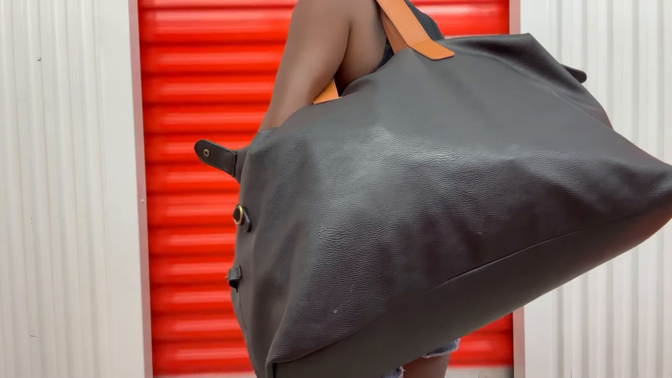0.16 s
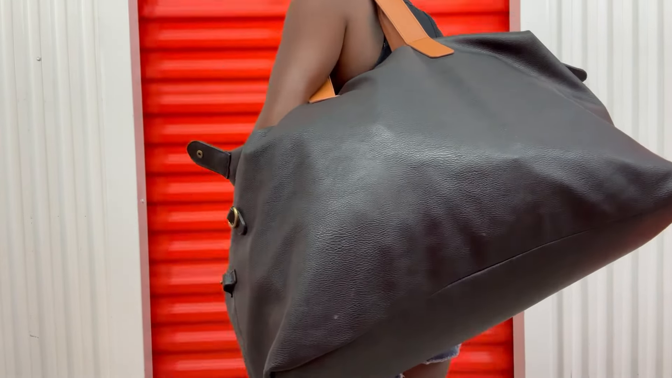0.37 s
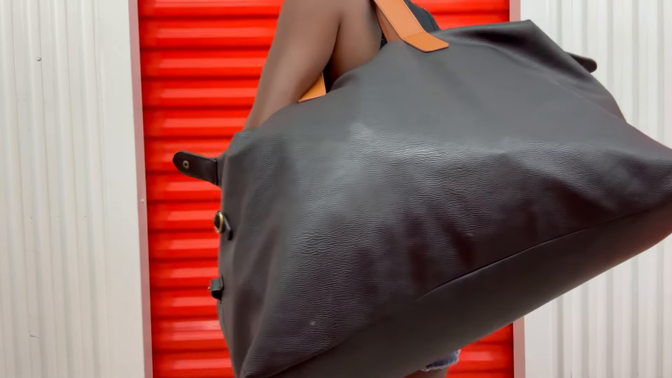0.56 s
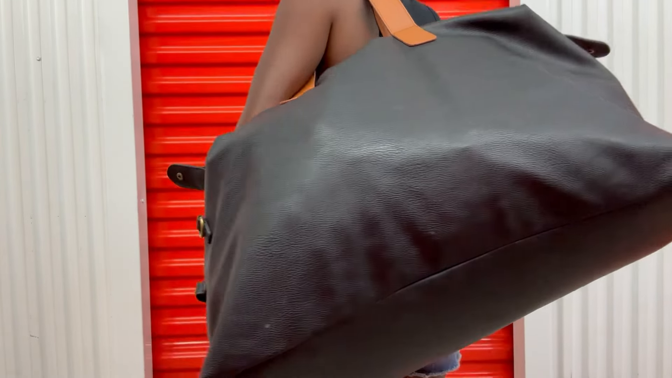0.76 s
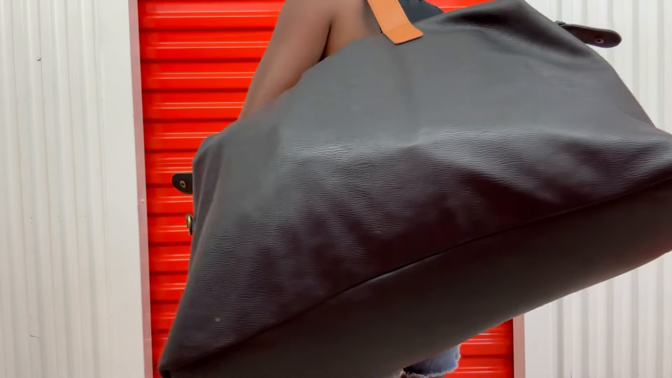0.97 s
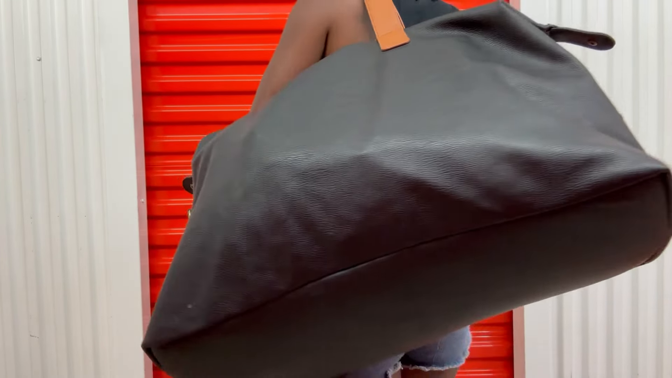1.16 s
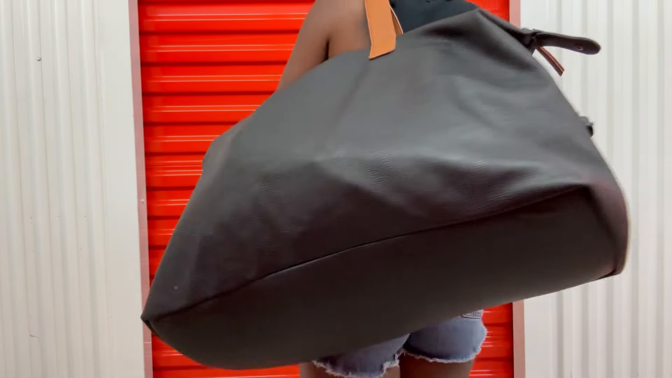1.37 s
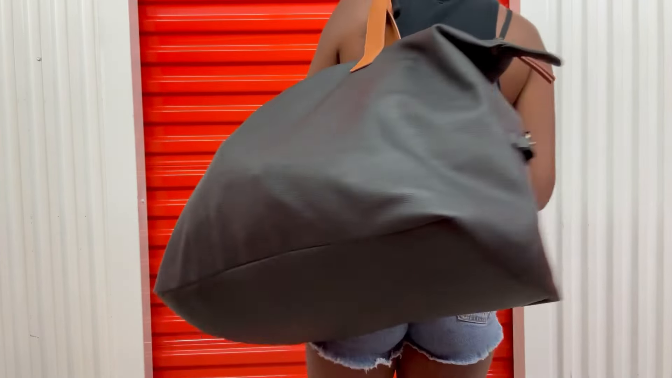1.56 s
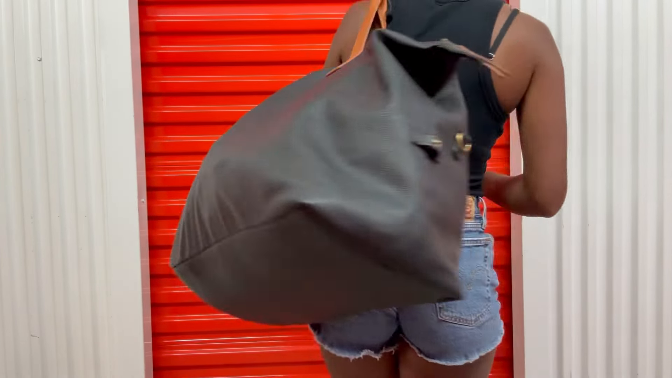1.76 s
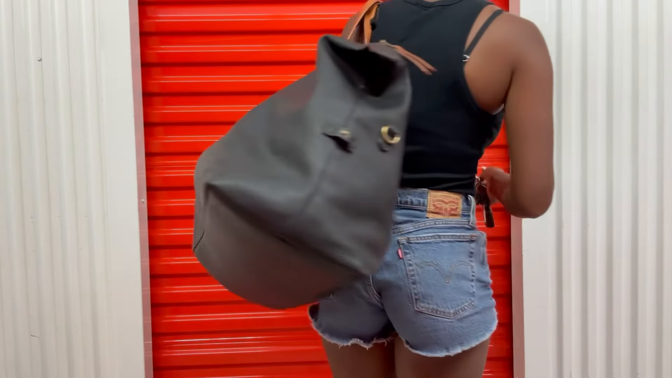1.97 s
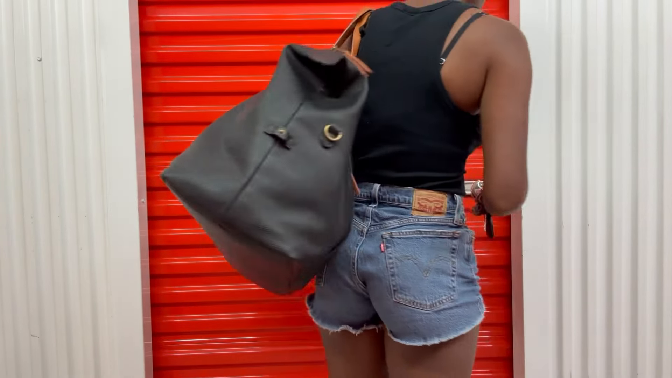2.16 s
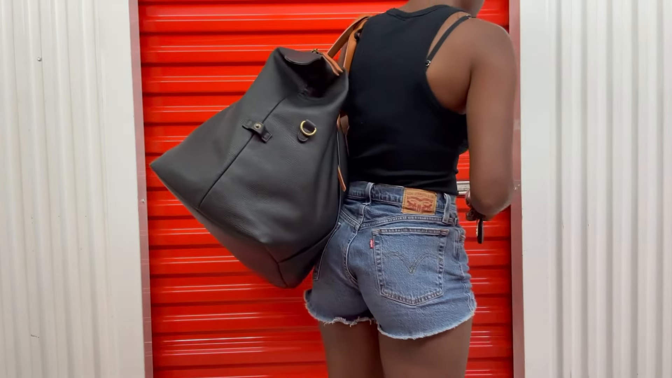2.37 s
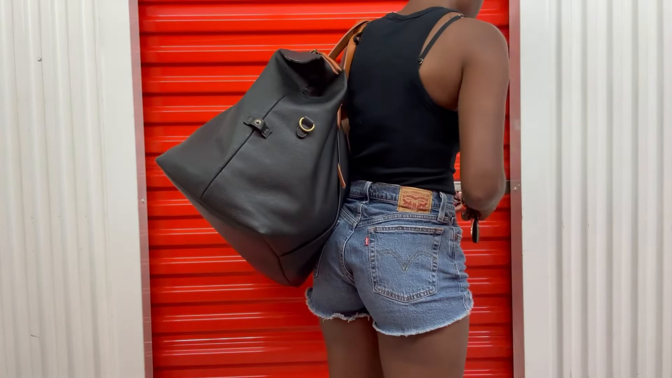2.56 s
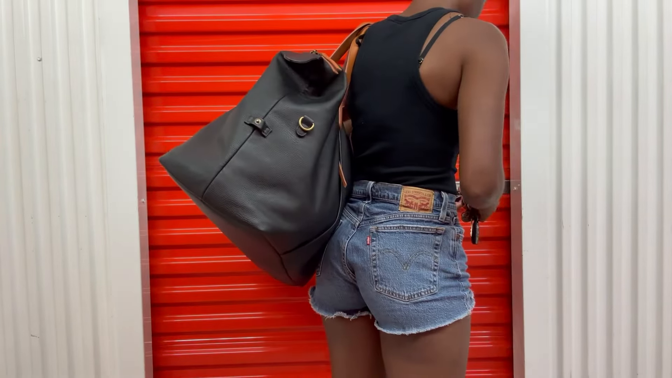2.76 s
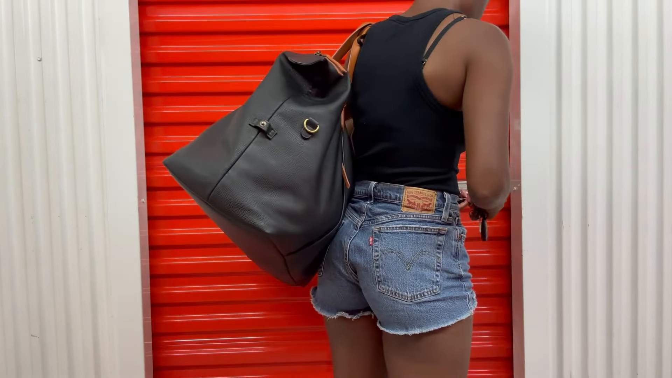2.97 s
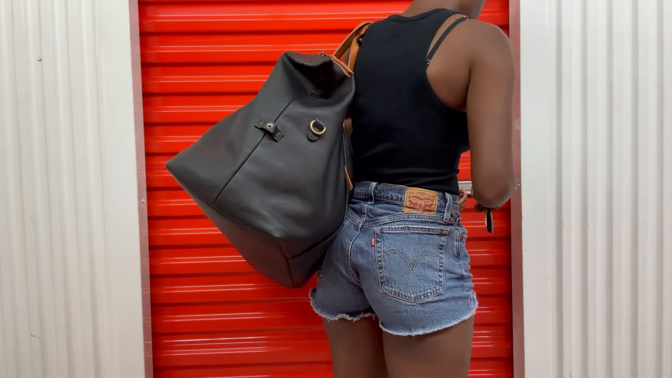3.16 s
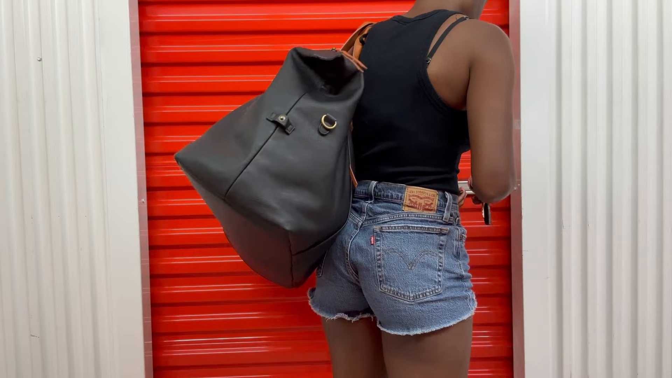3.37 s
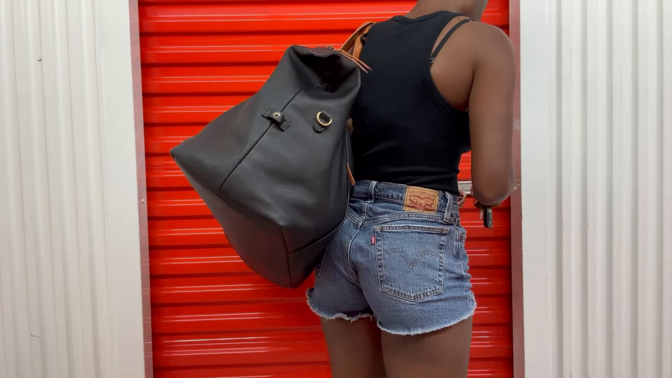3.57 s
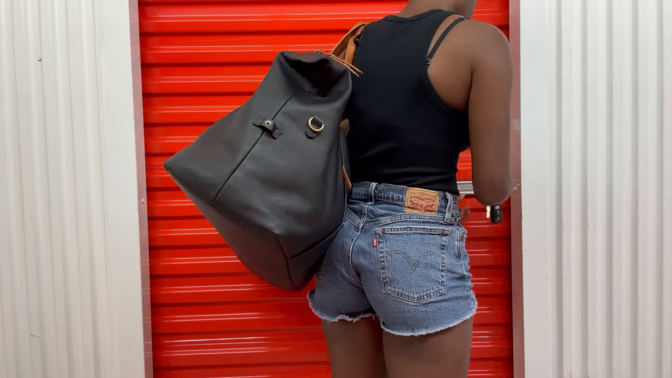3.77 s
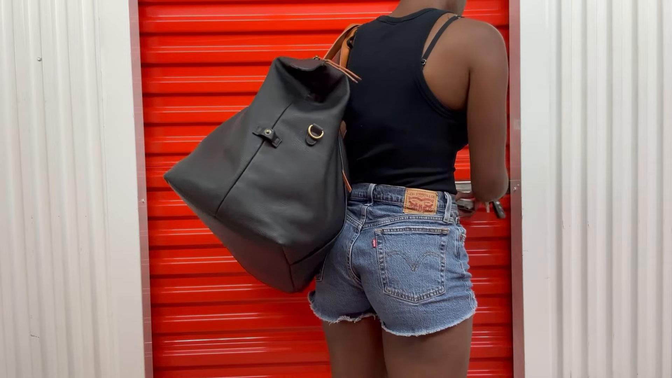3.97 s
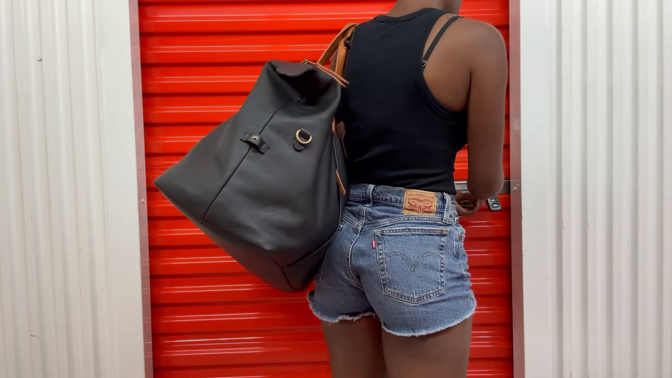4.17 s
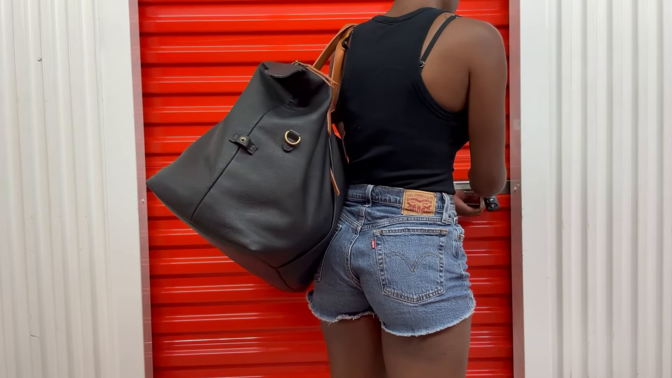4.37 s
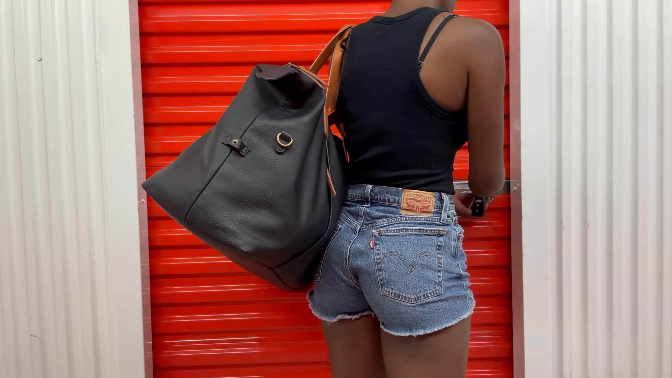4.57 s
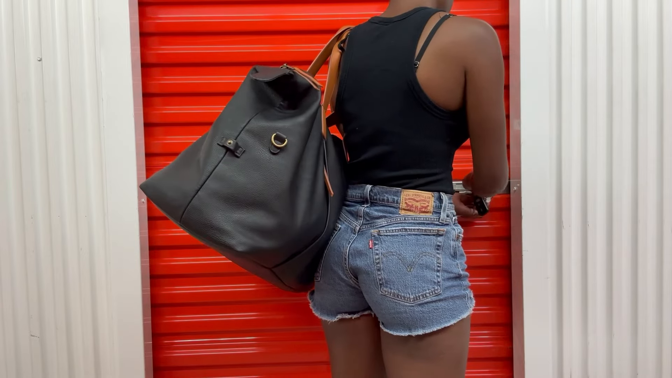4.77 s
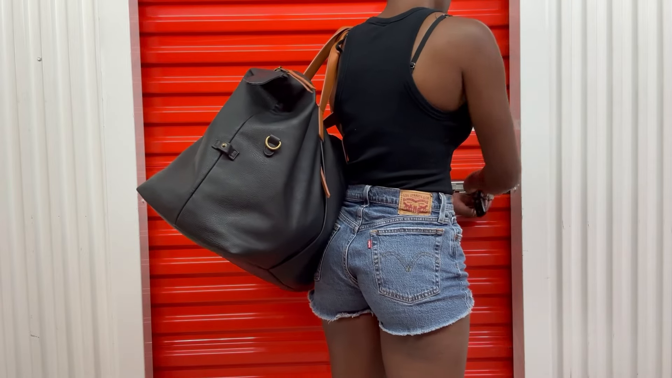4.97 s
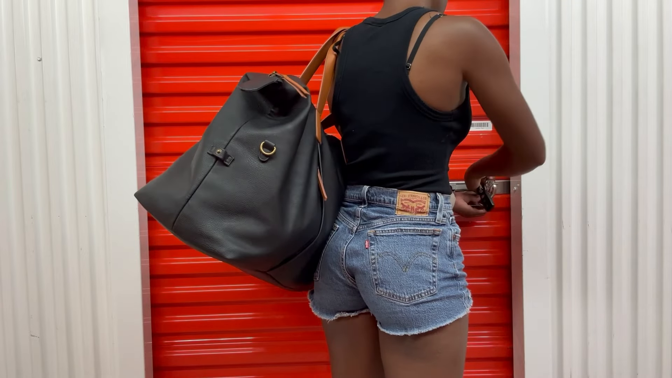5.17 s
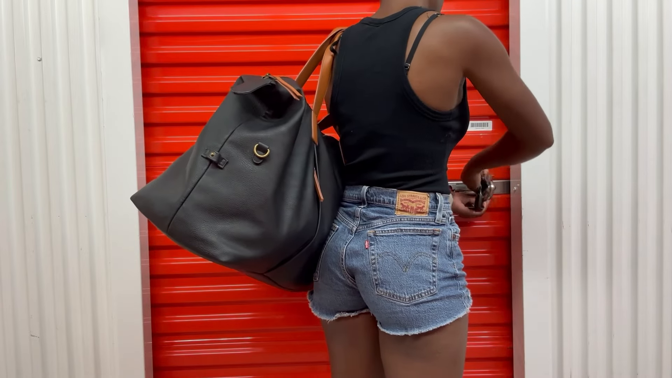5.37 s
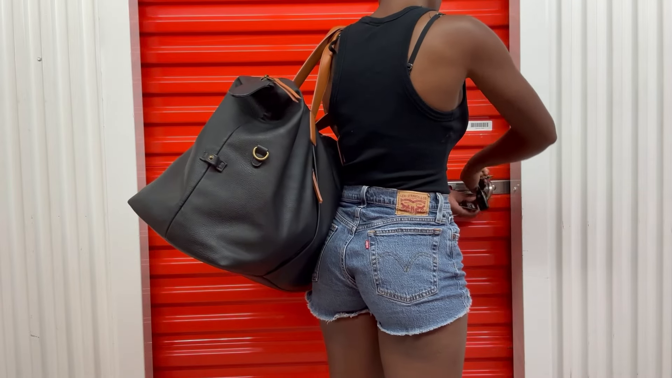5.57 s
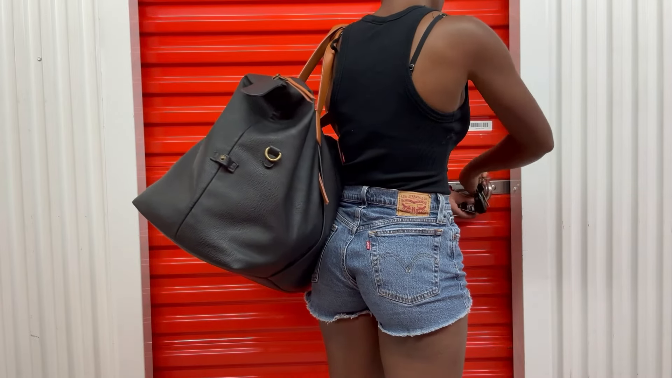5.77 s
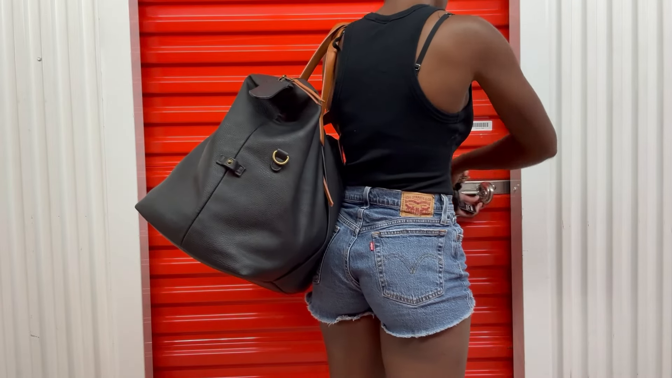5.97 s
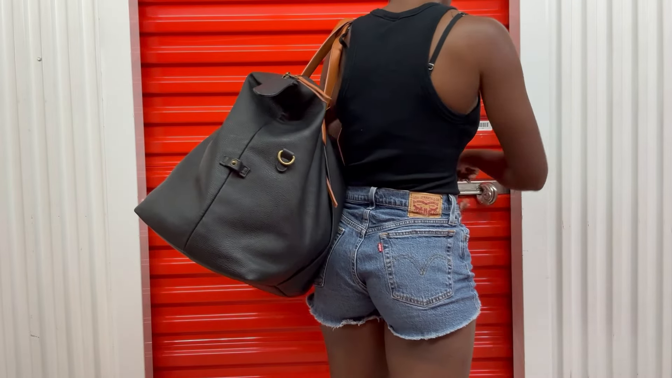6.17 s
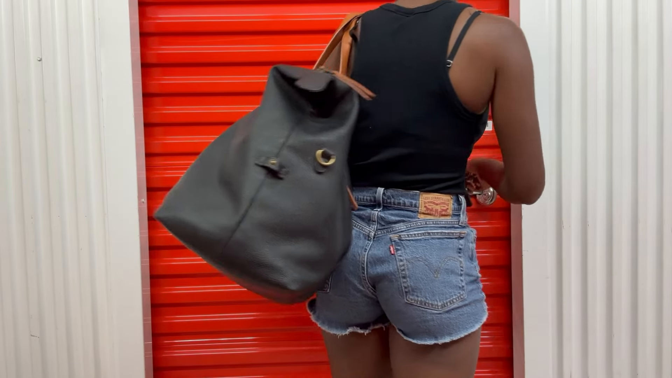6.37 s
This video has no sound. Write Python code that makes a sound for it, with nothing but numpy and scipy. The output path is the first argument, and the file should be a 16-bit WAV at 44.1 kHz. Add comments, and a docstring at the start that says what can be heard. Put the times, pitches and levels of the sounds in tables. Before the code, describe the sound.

A steel shutter rattles fast and loud, its sheet ringing and booming, and stops within just over a second, its echo fading. Much quieter handling follows: a faint brush of leather, a flurry of latch clicks, sparse faint touches, then firmer bolt and padlock clacks with light key jingles. Everything is heard near the door in stereo, in a bare echoing corridor with steady low duct drone and faint hiss.

```python
"""A hard, ringing storage corridor, where a corrugated steel roll-up door is pulled down.
Random impacts through ringing modes make its slats rattle; shaped noise booms in surges until it settles.
A leather bag rubs on cloth, then short bursts of touches ring the latch, padlock and keys as the door is locked.
Ventilation, made of shaped noise, rumbles, drones and hisses throughout."""
import sys
import numpy as np
from scipy import signal
from scipy.fft import rfft, irfft
from scipy.io import wavfile
from scipy.ndimage import uniform_filter1d

SR = 44100
rng = np.random.default_rng(int(sys.argv[2]) if len(sys.argv) > 2 else 0)


def inscribe(sig):
    """Save sig as 16-bit PCM at rate SR to the path in sys.argv[1].

    A 1-D sig is mono; a 2-D sig holds one channel per row.
    Samples are clipped to [-1, 1] before scaling.
    """
    pcm = np.round(np.clip(np.atleast_2d(sig).T, -1, 1) * 32767)
    wavfile.write(sys.argv[1], SR, pcm.astype(np.int16))


N = 286650
TIME = np.arange(N) / SR   # seconds

# The hardest knocks of slats going over the drum.
# Each row: time in seconds, relative knock level in dB, pitch the sheet rings at in Hz, relative ring level in dB.
KNOCKS = [(0.053, -3.5, 500, -15.5), (0.089, -3.5, 499, -15.5), (0.14, -14, 1130, -24),
          (0.174, -2, 512, -20.5), (0.2, -7.5, 616, -16.5), (0.225, -5.5, 700, -30), (0.265, -8, 800, -25),
          (0.3, -9, 1110, -29.5), (0.383, -5.5, 1112, -18), (0.42, -10, 456, -17.5),
          (0.453, -5, 675, -22.5), (0.53, -7, 499, -18.5), (0.575, -11, 493.4, -12.5), (0.6, -9, 518, -19),
          (0.655, -7.5, 489, -22), (0.784, -10, 597.3, -11.5), (0.812, -12.5, 616, -29),
          (0.873, -7, 512.5, -21.5), (0.908, -14.5, 500, -25.5), (1.033, -19, 505, -32),
          (1.09, -27.5, 795, -33), (1.199, -47, 510, -42)]
# Ringing of the latch plate and the panel behind it.
# Each row: pitch in Hz, width in Hz, level in dB over the broad clack.
LATCH_MODES = [(497.5, 36, 17.5), (584, 95, 4), (742, 61, 0.5), (954, 12, -1), (1300, 40, -7),
               (1910, 29, 1), (2246, 75, -3.5), (4730, 250, -5)]
# How the corridor echoes.
# Each row: frequency in Hz, time to fade by 60 dB in seconds, left-right likeness (1 is identical).
CORRIDOR = [(60.5, 0.21, 0.99), (100, 0.5, 0.98), (153.6, 0.99, 0.85), (300, 0.86, 0.61), (546, 0.74, 0.25),
            (1210, 0.58, 0.42), (2400, 0.61, 0.05), (6700, 0.48, 0), (12700, 0.24, 0)]


def door(count=3):
    """The tall curtain sounds from several heights at once; one edge squeals and the whole sheet booms in surges."""
    # Broad colour of the boom. Each row: frequency in Hz, relative level in dB per Hz.
    boom_colour = [(15, -39.5), (28, -17), (42, -2), (60, -0.5), (95, 4.5), (122, 3), (160, -7), (200, 0),
                   (270, -8.5), (330, -11.5), (450, -33), (700, -77)]
    # The loose curtain buckles as it unrolls. Each row: peak time in seconds, relative peak level in dB.
    surge_rows = [(.075, -14.5), (.145, -12.5), (.19, -13.5), (.235, -14), (.31, -15), (.4, -13.5),
                  (0.444, -16.5), (.49, -21), (.565, -15.5), (.635, -17), (.675, -14), (.735, -21.5),
                  (.8, -14.5), (.88, -11), (1.0, -28), (1.11, -24), (1.21, -24.5)]
    squeal_hz, squeal_width_hz, surge_width_s = 6535, 40, 0.021
    boom_db, boom_follows, surge_db = -10.5, 0.66, -6.5   # a power below 1 lets the boom linger

    rattle = sum(slats(KNOCKS[k::count]) for k in range(count))
    low_hz, high_hz = squeal_hz - squeal_width_hz / 2, squeal_hz + squeal_width_hz / 2
    edge = rms_one(band(diffuse_noise(size=N), low_hz, high_hz))
    squeal = squeal_gain() * edge
    flexing = steadied(colour(diffuse_noise(size=N), boom_colour), window_s=0.022)
    surges = sum(from_db(db) * np.exp(-.5 * ((TIME - s) / surge_width_s) ** 2) for s, db in surge_rows)
    boom_gain = np.hypot(from_db(boom_db) * motion() ** boom_follows, from_db(surge_db) * surges)
    return rattle + sheet() + squeal + boom_gain * flexing


def slats(knock_rows):
    """One stretch of the curtain: its slats rattle and knock, their edges scrape in the guides."""
    # Broad colour of the clatter. Each row: frequency in Hz, relative level in dB per Hz.
    clatter_colour = [(40, -47), (120, -12), (220, -6), (350, -2), (550, -3), (850, -3), (1300, -6.5),
                      (2000, -8), (3200, -15), (5000, -16.5), (13000, -33.5), (16000, -28.5)]
    # Ringing of the steel curtain. Each row: pitch in Hz, width in Hz, level in dB over the broad clatter.
    door_modes = [(196.3, 21.5, 9), (504, 20.5, 13), (598, 19, 4), (663, 230, 3.5), (933, 23, -9),
                  (768, 9.5, -4), (1075, 83, -2), (1070, 50, -2), (1248, 18, 4), (1606, 110, -2.5),
                  (2273, 110, 2), (3010, 130, -1), (4160, 160, -2.5), (6100, 35, 8), (6500, 50, 5.5)]
    # Hiss of the slat edges. Each row: frequency in Hz, relative level in dB per Hz.
    scrape_colour = [(1500, -25), (3500, 0), (6500, 0), (13000, -5), (16000, -14)]
    rattle_db, scrape_db = -7.5, -14.5   # relative to the motion
    scrape_follows = 1.35   # a power above 1: the scrape fades faster than the rattle as the door slows
    catch_scrape_db = 3   # a catching edge also scrapes harder: relative to its squeal

    moving = motion()
    blows = from_db(rattle_db) * moving * grains(per_s=60, spread_db=3)
    for s, db, _, _ in knock_rows:
        add(blows, s, from_db(db + 23.0) * chatter(length_s=0.0038, per_s=4000))
    clatter = np.std(blows) * rms_one(resonate(colour(blows, clatter_colour), door_modes))
    catching = from_db(catch_scrape_db) * squeal_gain()
    scrape_gain = np.hypot(from_db(scrape_db) * moving ** scrape_follows, catching)
    scrape = scrape_gain * colour(grains(per_s=980, spread_db=21.5), scrape_colour)
    return corridor(clatter + scrape, direct_db=-8.5, early_db=-24.0, early_s=0.019, lag_ms=-.1)


def squeal_gain():
    """A slat edge catches in its guide for a moment, several times."""
    # Each row: start in seconds, length in seconds, level in dB.
    catches = [(.09, 0.016, -34.5), (.28, 0.0067, -33.5), (.42, 0.056, -36), (.85, 0.083, -43)]
    return strokes(catches, attack_s=0.025, release_s=0.064)


def sheet():
    """The hanging sheet keeps changing shape, so each hard knock leaves it ringing at a different pitch."""
    attack_s, t60_s = 0.0055, 0.33   # t60: time to fade by 60 dB
    track, age = np.zeros(N), TIME[:SR]
    envelope = (1 - np.exp(-age / attack_s)) * from_db(-60 * age / t60_s)
    for s, _, hz, db in KNOCKS:
        add(track, s, from_db(db) * envelope * np.sin(2 * np.pi * (hz * age + rng.random())))
    return corridor(track, direct_db=3, early_db=1, early_s=0.018, lag_ms=0)


def motion():
    """How hard the door is moving, as a gain; nothing once it has settled."""
    # The vigour of the door's travel. Each row: time in seconds, level in dB.
    travel = [(0.0, -14), (0.036, -23), (0.058, -13.5), (0.162, -16), (0.174, -12.5), (0.302, -14.5),
              (0.654, -17.5), (0.734, -20.5), (0.798, -17), (0.916, -18.5), (0.978, -25.5), (1.046, -24),
              (1.578, -71), (1.62, -80)]
    return from_db(in_time(travel)[0]) * (TIME < travel[-1][0])


def latch(count=2):
    """Every contact shakes both lock and door, each heard by a path of its own; the bolt grinds in small slips."""
    # The bolt dragging in its sleeve. Each row: start in seconds, length in seconds, relative level in dB.
    drags = [(2.37, 0.12, -42), (4.245, 0.055, -32.5), (4.39, 0.035, -26.5), (4.51, 0.098, -36.5),
             (5.81, 0.06, -33)]
    grit = rms_one(band(grains(per_s=170, spread_db=10.0), 490, 2700, order=4))
    slips = from_db(-10.5) * strokes(drags, attack_s=0.025, release_s=0.023) * grit
    grind = corridor(resonate(slips, LATCH_MODES), direct_db=-4.5, early_db=-1, early_s=0.024, lag_ms=0.12)
    knocks = sum(contacts() for _ in range(count)) / np.sqrt(count)
    return grind + knocks + squeaks() + keys()


def contacts():
    """Each contact thuds through the door panel, clacks and rings; the parts take separate paths to the ear."""
    # Metal contacts. Each row: time in seconds, part struck, then relative levels in dB of the clack,
    # the door-panel thud and the bright clink, and extra ring of the panel's lowest mode in dB.
    contact_rows = [ (1.82, "buckle", -59, -79.5, -77.5, -2), (2.014, "keeper", -29.5, -44, -41, 1),
                    (2.179, "hasp", -34, -41, -48.5, 11), (2.335, "staple", -31.5, -50, -42, -19),
                    (2.382, "bolt", -33.5, -36.5, -46, -24), (2.445, "staple", -26.5, -34, -31, -4),
                    (2.4945, "padlock", -30, -27.5, -35, 7), (2.517, "hasp", -23, -34.5, -29.5, -4),
                    (2.661, "hasp", -35.5, -33, -36.5, -5), (2.984, "plate", -35, -32, -32, -3),
                    (3.314, "staple", -58, -49.5, -84, -11), (3.426, "bracket", -52, -42.5, -82, 0),
                    (3.443, "hasp", -52, -46.5, -82, 0), (3.555, "hasp", -47, -44.5, -66, 5),
                    (3.631, "padlock", -50.5, -47.5, -57, -16), (3.674, "bracket", -57, -52, -77, -2),
                    (3.883, "bolt", -42.5, -42, -51, -7), (4.188, "plate", -35.5, -41, -56.5, -2),
                    (4.236, "plate", -37, -38, -56, -5), (4.253, "staple", -39.5, -38, -62, -2),
                    (4.286, "staple", -36.5, -45, -56, 12), (4.325, "plate", -46, -42, -65, -4),
                    (4.387, "bracket", -40, -34, -52, -6), (4.4426, "hasp", -30, -37.5, -47, -6),
                    (4.48, "panel", -38, -49, -64, 7), (4.493, "plate", -52, -40, -62, -13),
                    (4.55, "hasp", -40.5, -58, -63, -8), (4.568, "keeper", -45, -44.5, -55, -8),
                    (4.649, "plate", -57, -50, -55, 1), (4.709, "bolt", -31.5, -33.5, -40, -4),
                    (4.879, "plate", -55, -40, -73, -8), (5.045, "key", -28, -33.5, -38.5, 8),
                    (5.124, "hasp", -35, -38, -62, -13), (5.1515, "padlock", -24, -28, -34, -2),
                    (5.345, "shackle", -28, -32, -45, -12), (5.378, "padlock", -23.5, -28.5, -28, -2),
                    (5.5801, "padlock", -24, -26, -34.5, -7.5), (5.672, "bracket", -33.5, -32, -44.5, -2),
                    (5.77, "plate", -37.5, -38.5, -51, -2), (5.814, "padlock", -38.5, -34.5, -46, -8),
                    (5.838, "hasp", -37.5, -39.5, -43, -8), (5.914, "bracket", -35, -31, -49, -1),
                    (5.939, "staple", -42.5, -44, -59, -5), (6.095, "hasp", -36, -38, -52, -25)]
    # Metal parts of door, lock and bag. Each row: pitch in Hz, ring in dB relative to the clack (before a
    # shared lift), chatter length in seconds, top of the sound in Hz.
    parts = {"panel": (240, 0, 0.03, 5000), "plate": (956, -3, 0.006, 3000), "bolt": (2220, 1, 0.005, 6000),
             "hasp": (3420, -14, 0.005, 12000), "staple": (1650, -6, 0.005, 9000),
             "bracket": (1300, -1, 0.008, 4000), "keeper": (2860, -7, 0.004, 12000),
             "padlock": (3100, -27, 0.006, 12000), "key": (7300, -12, 0.005, 14000),
             "shackle": (3350, -1.4, 0.003, 12000), "buckle": (3500, 8, .003, 6000)}
    # Low ringing of the shaken curtain. Each row: pitch in Hz, width in Hz, level in dB over the blow.
    shudder_modes = [(202.6, 18, 12), (264, 25, 9.5), (312, 11.4, 8)]
    mode_shift = 0.018   # the hand's pressure moves the pitches from blow to blow, as a share

    body, rings, clinks = np.zeros((3, N))
    for s, part, clack_db, thud_db, clink_db, panel_db in contact_rows:
        hz, ring_db, length_s, top_hz = parts[part]
        burst = chatter(length_s, per_s=2400, first_touch=.45, bite=.7)
        modes = []
        for k, (f, width, db) in enumerate(LATCH_MODES):
            shifted_hz = f * (1 + mode_shift * rng.standard_normal())
            modes.append((shifted_hz, width, db + panel_db * (k == 0)))
        plate = resonate(burst, modes)
        thud = from_db(thud_db + 30.5) * unit_energy(band(plate, 370, 1090))
        clack = from_db(clack_db + 26.0) * unit_energy(band(plate, 1114, 4730))
        tone = from_db(clack_db + ring_db + 29.5) * ring(burst, hz, q=7, overtone=1.74, overtone_db=-14.5)
        # the loose curtain shakes with every push
        shaken = resonate(band(burst, 104, 326), shudder_modes)
        shudder = from_db(thud_db + 21.0) * unit_energy(shaken)
        add(body, s, band(thud - clack + shudder, 81, top_hz, order=4))
        add(rings, s, band(tone, 81, top_hz, order=4))
        add(clinks, s, from_db(clink_db + 27.0) * unit_energy(band(plate, 2900, 12400)))
    return (corridor(body, direct_db=-11, early_db=-1.0, early_s=0.025, lag_ms=.136)
            + corridor(rings, direct_db=-12, early_db=10, early_s=0.024, lag_ms=.136)
            + corridor(clinks, direct_db=-8.0, early_db=-3.5, early_s=0.016, lag_ms=0.14))


def ring(burst, hz, q, overtone, overtone_db):
    """A small part rings at its own pitch and at one inharmonic overtone."""
    low, high = (signal.lfilter(*signal.iirpeak(min(f, SR / 2 - 1000), q, fs=SR), burst + 1e-18)
                 for f in (hz, hz * overtone))
    return unit_energy(low) + from_db(overtone_db) * unit_energy(high)


def chatter(length_s, per_s, first_touch=1.72, bite=0.1):
    """One contact: a first touch, then the parts bite (over a share of the length) and rebound in a dying burst."""
    age = TIME[:SR // 4] / max(length_s, .002)
    touches = rng.standard_normal(len(age)) * (rng.random(len(age)) < per_s / SR)
    burst = touches * (1 - np.exp(-age / bite)) * np.exp(-age)
    burst[0] = first_touch
    return unit_energy(burst)


def squeaks():
    """Each slip of tight steel in the latch is one short, rough, slightly rising chirp."""
    # Each row: start in seconds, length in seconds, middle pitch in Hz, relative level in dB.
    squeak_rows = [(3.95, 0.015, 5950, -48), (5.063, .012, 7100, -44)]
    glide, rough = 0.089, 0.06   # rise in pitch over one squeak and random waver, as shares of the pitch
    track = np.zeros(N)
    for s, length_s, hz, db in squeak_rows:
        progress = np.linspace(0, 1, int(length_s * SR))
        waver = rms_one(uniform_filter1d(rng.standard_normal(len(progress)), size=16))
        pitch = hz * (1 + glide * (progress - .5) + rough * waver)
        swell = np.sin(np.pi * progress)
        add(track, s, from_db(db) * swell * np.sin(2 * np.pi * np.cumsum(pitch) / SR))
    return corridor(track, direct_db=-3, early_db=-1, early_s=0.027, lag_ms=0)


def keys():
    """Keys touch on their ring, close by: tiny bright ticks that hardly stir the corridor."""
    # Each row: time in seconds, relative level in dB.
    ticks = [(2.947, -39), (4.697, -21), (5.019, -21.5), (5.306, -23), (6.197, -22.5), (6.3116, -19.5),
             (6.427, -30)]
    track = np.zeros(N)
    for s, db in ticks:
        tick = band(chatter(length_s=0.0019, per_s=4000), 1500, 7600, order=1)
        add(track, s, from_db(db) * unit_energy(tick))
    return corridor(track, direct_db=-1, early_db=8.5, early_s=0.014, lag_ms=.136)


def bag():
    """Leather slides over cloth as the bag swings round: many tiny catches, shaped in colour and level."""
    # The bag brushing against clothes. Each row: time in seconds, level in dB.
    brush = [(1.4, -79), (1.52, -73), (1.66, -74), (1.8, -56), (1.9, -60.5), (1.97, -70), (2.1, -99)]
    # Colour of the rub. Each row: frequency in Hz, relative level in dB per Hz.
    leather = [(600, -13), (1500, -15), (3200, 3), (7000, 2.5), (12000, -1.5), (16000, -2)]
    rub = from_db(in_time(brush)[0]) * colour(grains(per_s=2400, spread_db=9.5), leather)
    return corridor(rub, direct_db=-3.5, early_db=21.5, early_s=0.012, lag_ms=0)


def ventilation():
    """Air rumbles and drones unevenly in the ducts, with a faint hiss above."""
    # The slow drift in level. Each row: time in seconds, rumble in dB, higher drone in dB.
    vent_level = [(1.35, -44.5, -52), (1.7, -45.5, -54.5), (3.3, -42, -48), (4.7, -42, -47.5),
                  (5.5, -38.5, -43), (6.5, -41, -47.5)]
    # Brief swells of the rumble. Each row: start in seconds, length in seconds, level in dB.
    swells = [(2.72, 0.037, -40), (3.11, 0.032, -35.5), (4.09, 0.04, -35.5), (4.3, 0.034, -38),
              (5.14, 0.046, -36), (6.33, 0.13, -39)]
    # Colour of the rumble. Each row: frequency in Hz, relative level in dB per Hz.
    rumble_colour = [(20, -29), (35, -17.5), (47, -9.5), (57, -1.5), (74, -4.5), (90, -0.5), (105, -17),
                     (170, -33), (400, -87.5)]
    # The duct's own note. Each row: pitch in Hz, width in Hz, level in dB over the rumble.
    duct_modes = [(72.2, 5.7, 11.5)]
    # Colour of the faint hiss. Each row: frequency in Hz, relative level in dB per Hz.
    hiss_colour = [(40, -30.5), (110, -9), (170, 9), (260, -1.5), (500, -5), (1000, -22), (2200, -20),
                   (5000, -26.5), (12000, -32), (16000, -30.5)]

    rumble_db, drone_db = in_time(vent_level)
    flow = np.hypot(from_db(rumble_db), strokes(swells, attack_s=0.032, release_s=0.029))
    duct = resonate(colour(diffuse_noise(size=N), rumble_colour), duct_modes)
    rumble = flow * steadied(duct, window_s=0.067)
    drone = from_db(drone_db) * steadied(band(diffuse_noise(size=N), 112, 143), window_s=0.39)
    hiss = from_db(-55.5) * colour(diffuse_noise(size=N), hiss_colour)
    return rumble + drone + hiss


def corridor(x, direct_db, early_db, early_s, lag_ms):
    """Direct sound and echoes; with a lag above 0 the left ear hears the direct sound later."""
    echo, lag = echoes(early_db, early_s), round(lag_ms * SR / 1000)
    echo[0, max(lag, 0)] += from_db(direct_db)
    echo[1, max(-lag, 0)] += from_db(direct_db)
    echo = echo / np.sqrt(1 + from_db(2 * direct_db))   # keeps the overall level about the same
    running = np.pad(x, (SR, 0), "reflect")   # a sound already under way has filled the corridor
    return signal.fftconvolve(running[None], echo, axes=1)[:, SR:SR + N]


def echoes(early_db, early_s):
    """One path: a dense spray off the near steel walls and a tail that dies band by band; energy 1 per ear."""
    t = TIME[:SR]
    hz = np.fft.rfftfreq(SR, 1 / SR)
    noise, centres = rfft(diffuse_noise(size=SR)), np.log(np.array(CORRIDOR)[:, 0])
    echo = 0
    for share, (_, t60, _) in zip(np.eye(len(CORRIDOR)), CORRIDOR):
        part = irfft(noise * np.interp(np.log(hz + 1), centres, share), SR)
        echo = echo + part * (from_db(-60 * t / t60) + from_db(early_db) * np.exp(-t / early_s))
    # bare walls favour no pitch: the broad response is even
    response = rfft(echo)
    power = uniform_filter1d(np.mean(abs(response) ** 2, axis=0), size=70)
    even = irfft(response / np.sqrt(power), SR)
    # soft onset, and a fade to nothing over the last half second
    even = even * (1 - np.exp(-t / 0.00098)) * np.minimum(1, 4 * (1 - t) ** 2)
    return rms_one(even) / np.sqrt(SR)


def diffuse_noise(size):
    """White noise from all around: alike in both ears in the bass, unrelated in the treble."""
    alike = np.clip(at_hz(CORRIDOR, np.fft.rfftfreq(size, 1 / SR))[1], -1, 1)
    mid, side = rfft(rng.standard_normal((2, size)))
    return irfft(np.sqrt((1 + alike) / 2) * mid + np.sqrt((1 - alike) / 2) * side * [[1], [-1]], size)


def grains(per_s, spread_db):
    """Random tiny impacts of uneven size; rms 1."""
    sizes = from_db(spread_db * np.clip(rng.standard_normal(N), -2, 2)) * rng.choice([-1, 1], N)
    return rms_one(sizes * (rng.random(N) < per_s / SR))


def resonate(x, modes):
    """A steel part passes the blow on and rings at its modes."""
    out = x.copy()
    for hz, width_hz, db in modes:
        r = np.exp(-np.pi * width_hz / SR)   # a narrower mode rings longer
        top = np.array([1, 0, -1]) * (1 - r * r) / 2
        bottom = [1, -2 * r * np.cos(2 * np.pi * hz / SR), r * r]
        out += from_db(db) * signal.lfilter(top, bottom, x + 1e-18)
    return out


def strokes(rows, attack_s, release_s):
    """Gain of a series of rubs: each builds up to its start, holds and dies away."""
    gain = np.zeros(N)
    for s, length_s, db in rows:
        before, after = np.minimum(TIME - s, 0), np.maximum(TIME - s - length_s, 0)
        gain += from_db(db) * np.exp(before / attack_s - after / release_s)
    return gain


def steadied(x, window_s):
    """Even out the slow level of a noise; rms about 1."""
    return x / np.sqrt(uniform_filter1d(np.mean(x ** 2, axis=0), int(window_s * SR)) + 1e-9)


def colour(x, spectrum):
    """Shape a sound by a spectrum; rms 1."""
    hz = np.fft.rfftfreq(N, 1 / SR)
    return rms_one(irfft(rfft(x) * from_db(at_hz(spectrum, hz)[0]), N))


def band(x, low_hz, high_hz, order=2):
    """Keep only the sound between two frequencies."""
    sos = signal.butter(order, [low_hz, min(high_hz, SR / 2 - 1000)], "band", fs=SR, output="sos")
    return signal.sosfilt(sos, x + 1e-18)


def add(track, s, sound):
    """Mix a short sound into a track at a given time in seconds."""
    start = max(int(s * SR), 0)
    track[start:start + len(sound)] += sound[:N - start]


def in_time(rows):
    """Each column of a curve at every sample."""
    s, *columns = np.transpose(rows)
    return [np.interp(TIME, s, c) for c in columns]


def at_hz(points, hz):
    """Each column of a frequency table, read on a log axis."""
    f, *columns = np.transpose(points)
    return [np.interp(np.log(np.maximum(hz, 1)), np.log(f), c) for c in columns]


def from_db(db):
    """Decibels to gain."""
    return 10 ** (np.asarray(db) / 20)


def rms_one(x):
    """Scale to rms 1."""
    return x / np.sqrt(np.mean(x ** 2) + 1e-20)


def unit_energy(x):
    """Scale a short sound to energy 1."""
    return x / (np.linalg.norm(x) + 1e-12)


def microphones(x):
    """In the treble the two channels merge: the right becomes a late, inverted copy of the left."""
    # The microphone pair. Each row: frequency in Hz, share of the left signal that the right carries
    # late and inverted, left minus right in dB.
    pair = [(2570, 0.016, 0.3), (4730, 0.011, -0.6), (6250, 0.39, -3), (7300, 0.7, -0.5), (9200, 1, 1),
            (15000, 0.71, 0.5)]
    lag_s = 0.000208
    hz = np.fft.rfftfreq(N, 1 / SR)
    share, balance_db = at_hz(pair, hz)
    share = np.clip(share, 0, 1)
    left, right = rfft(x)
    late_left = left * np.exp(-2j * np.pi * hz * lag_s)
    right = np.sqrt(1 - share ** 2) * right - share * late_left
    return irfft(np.array([left * from_db(balance_db / 2), right * from_db(-balance_db / 2)]), N)


def scene():
    """Door, latch and bag over the ventilation."""
    return door() + latch() + bag() + ventilation()


def record(dry):
    """The microphone drops the deepest bass and lifts the high treble, peaks are rounded and the top is cut."""
    thinned = signal.sosfilt(signal.butter(2, 28, "high", fs=SR, output="sos"), microphones(dry))
    bright = thinned + from_db(-6.5) * band(thinned, 12000, 14000, order=1)
    rounded = 1.3 * np.tanh(bright / 1.3)
    return signal.sosfilt(signal.ellip(10, .1, 90, 15800, fs=SR, output="sos"), rounded)   # cut at 15800 Hz


dry = scene()
out = record(dry)
inscribe(out)
```